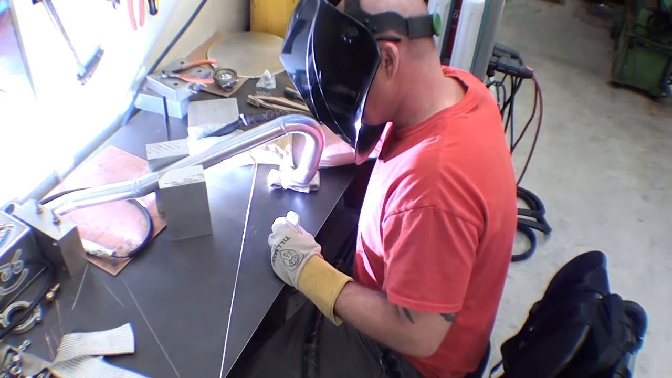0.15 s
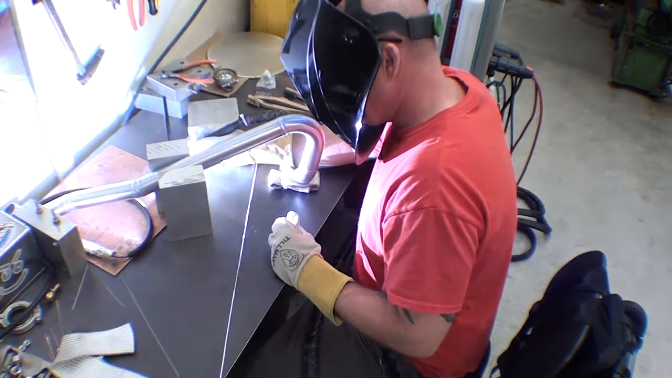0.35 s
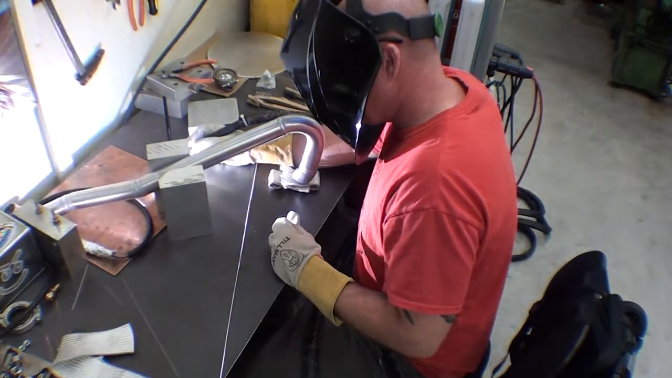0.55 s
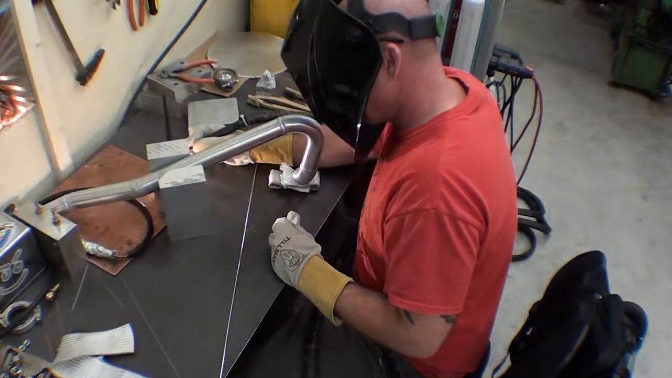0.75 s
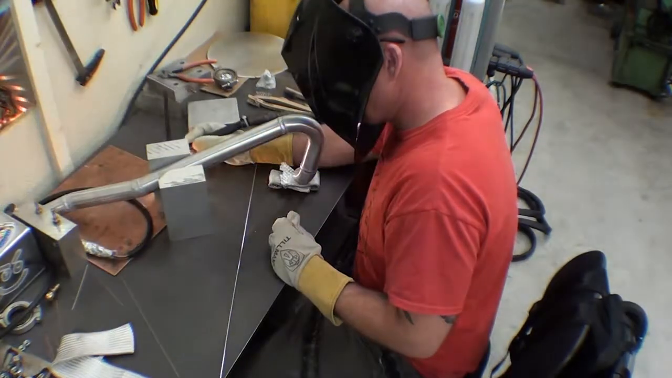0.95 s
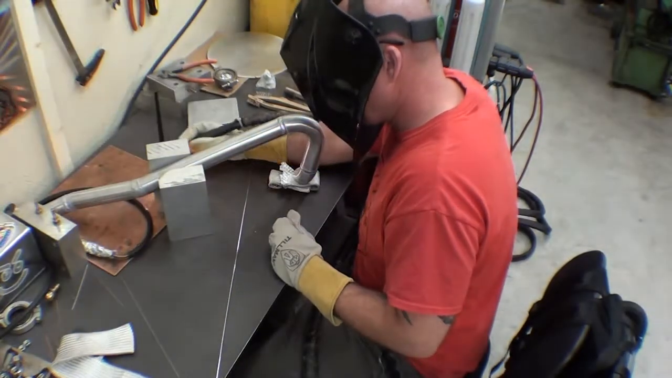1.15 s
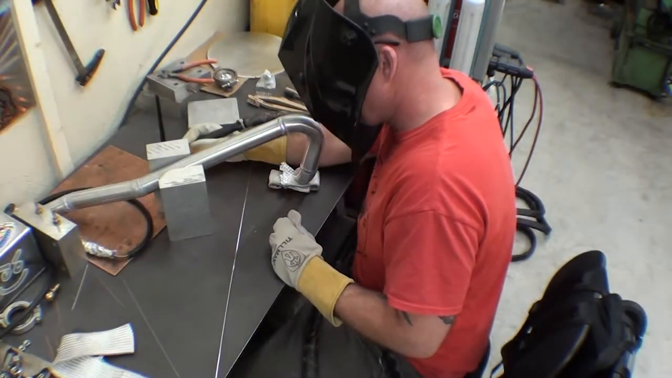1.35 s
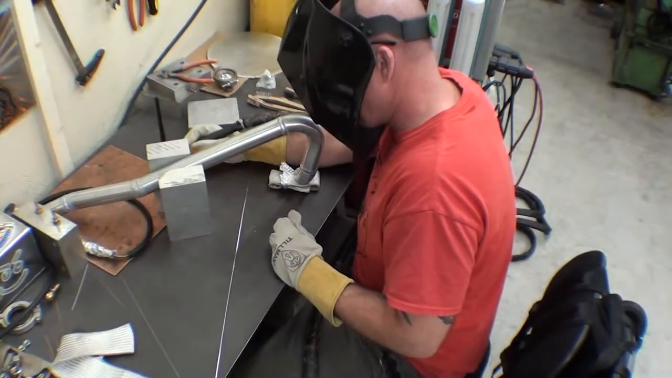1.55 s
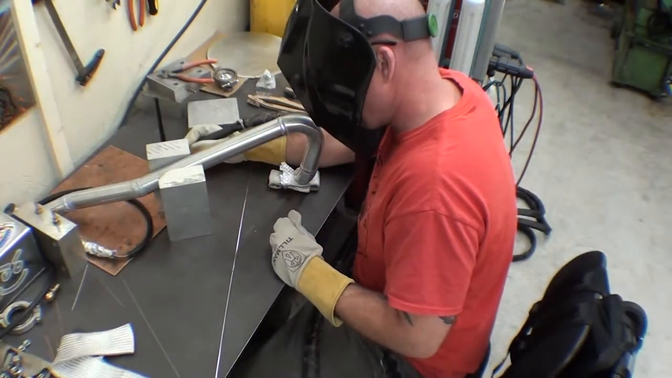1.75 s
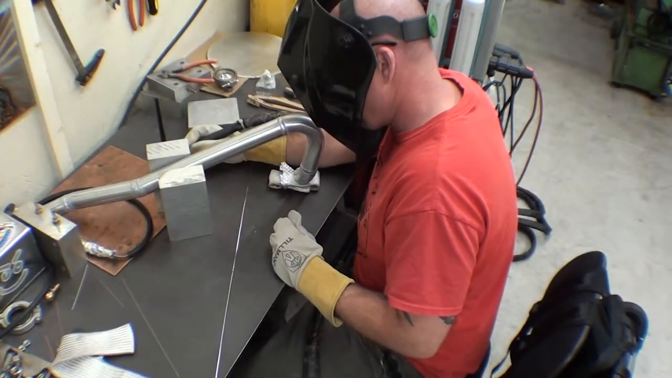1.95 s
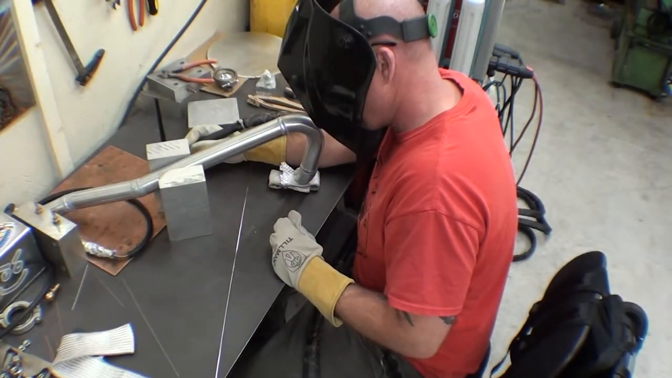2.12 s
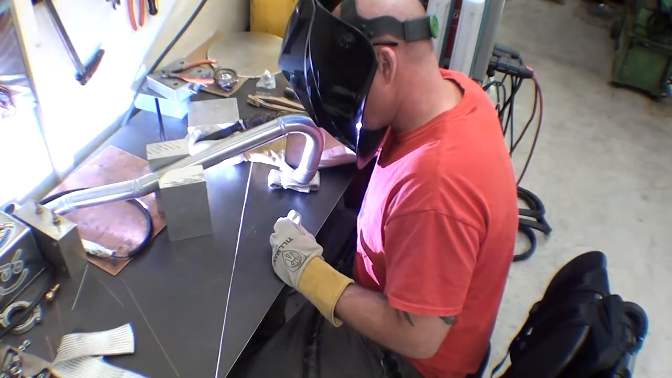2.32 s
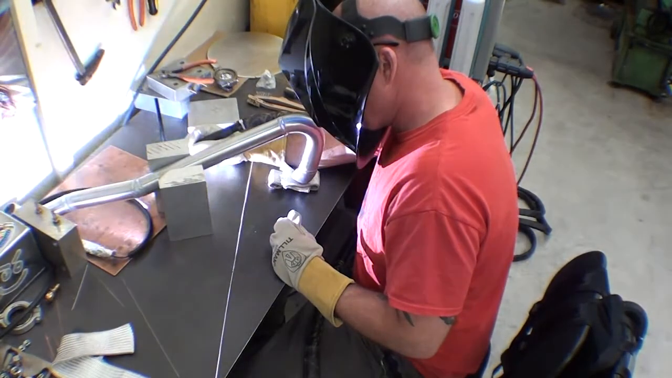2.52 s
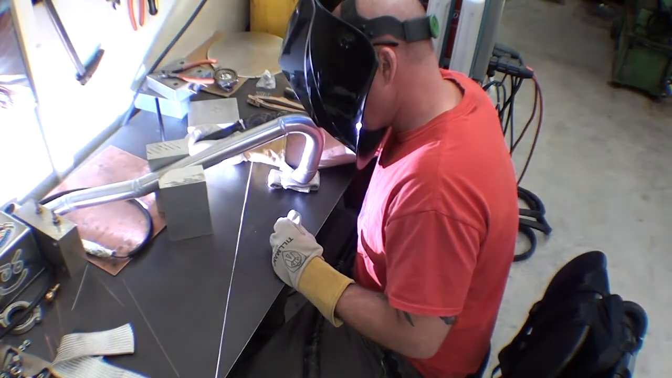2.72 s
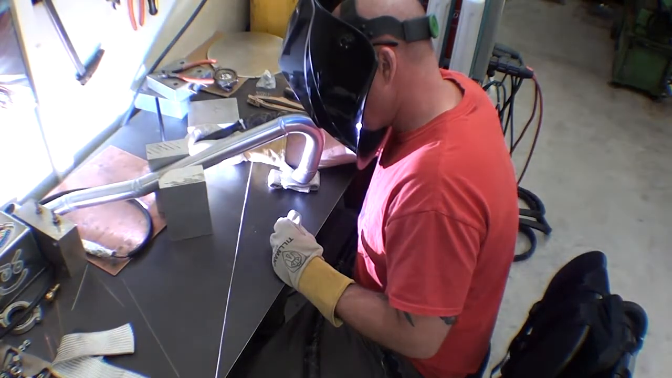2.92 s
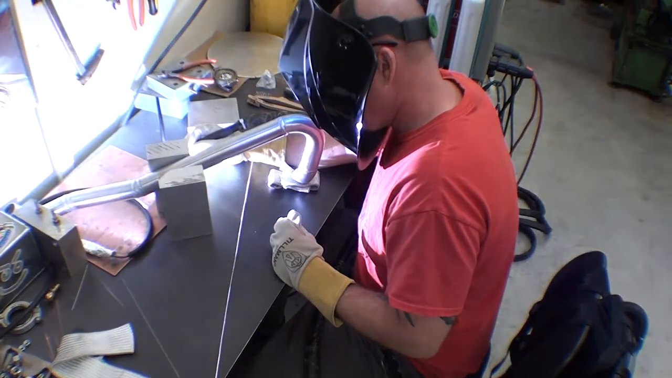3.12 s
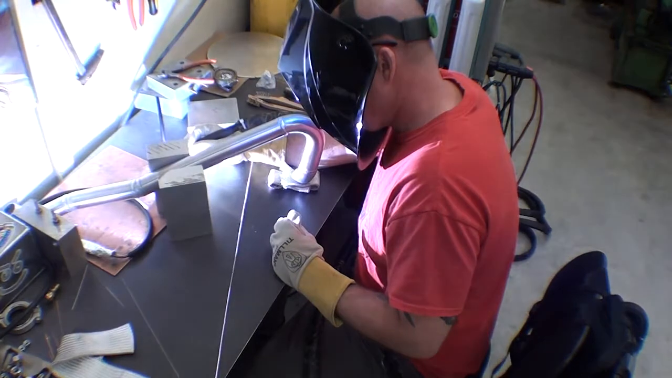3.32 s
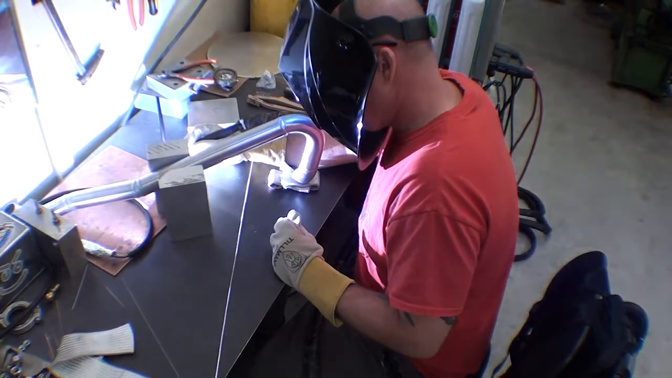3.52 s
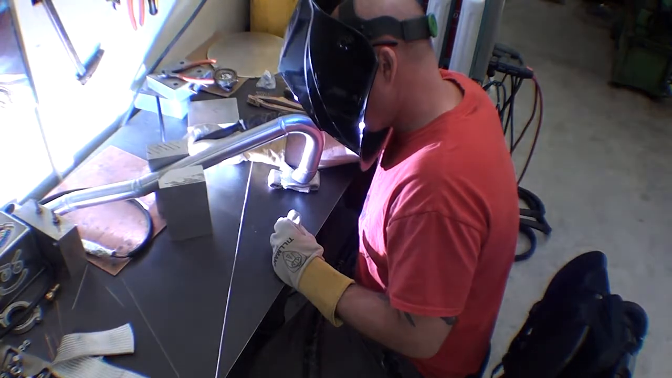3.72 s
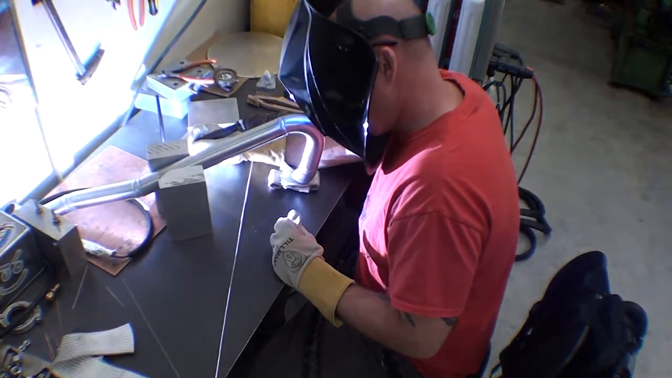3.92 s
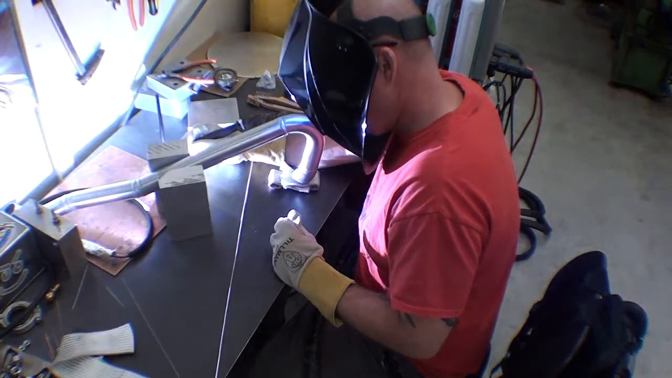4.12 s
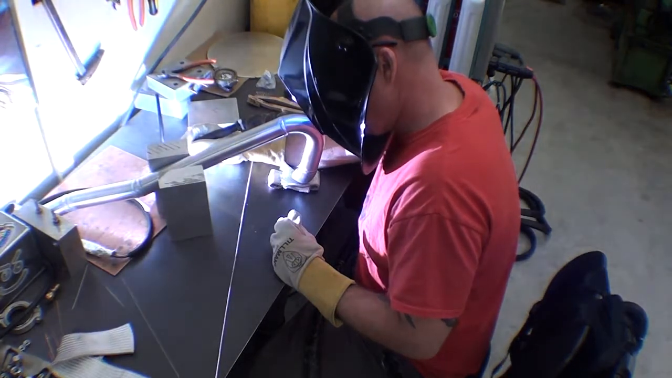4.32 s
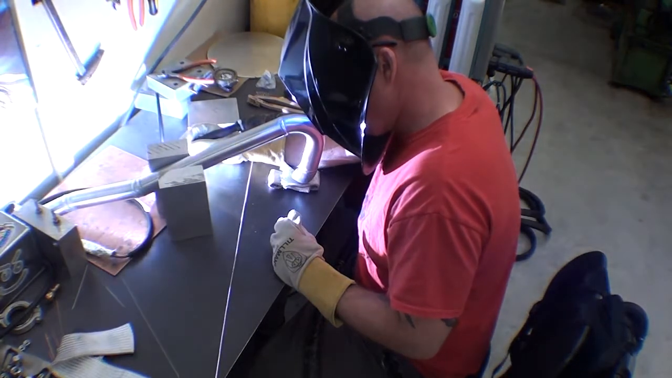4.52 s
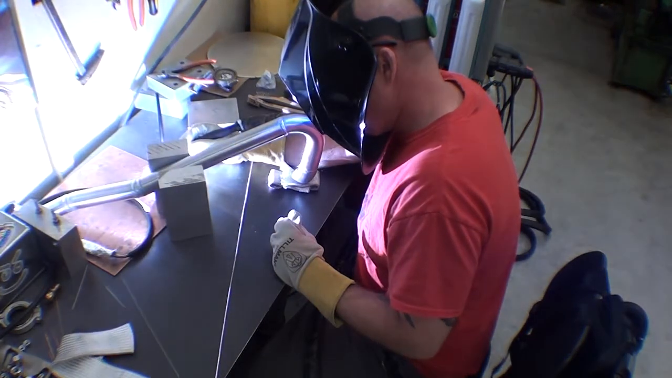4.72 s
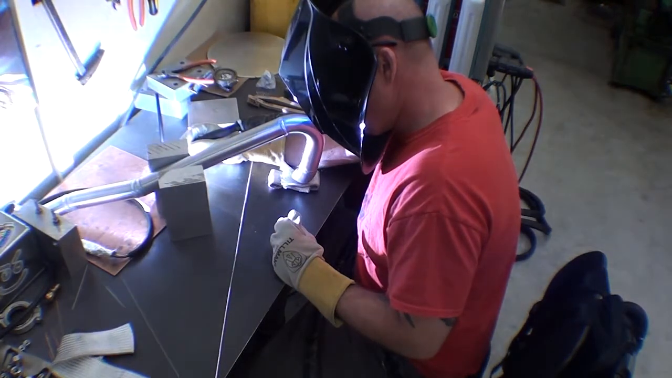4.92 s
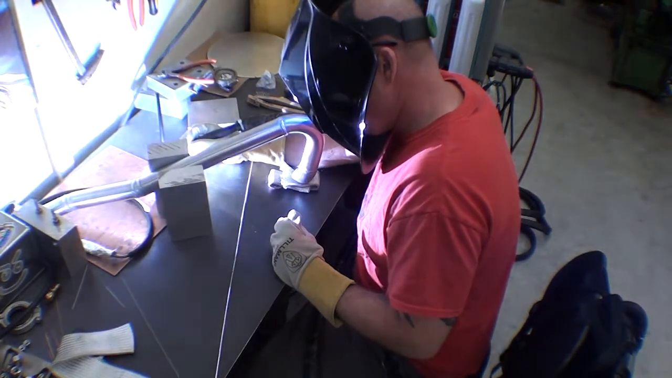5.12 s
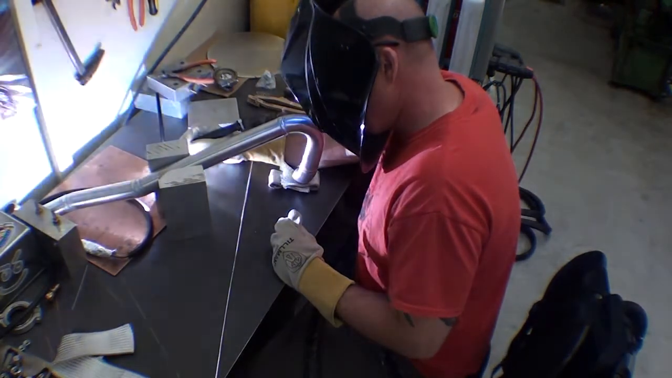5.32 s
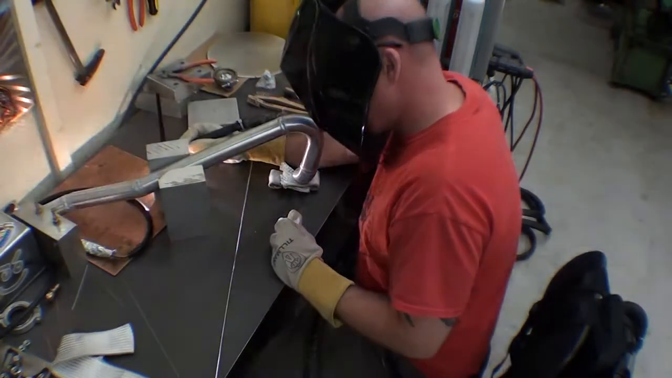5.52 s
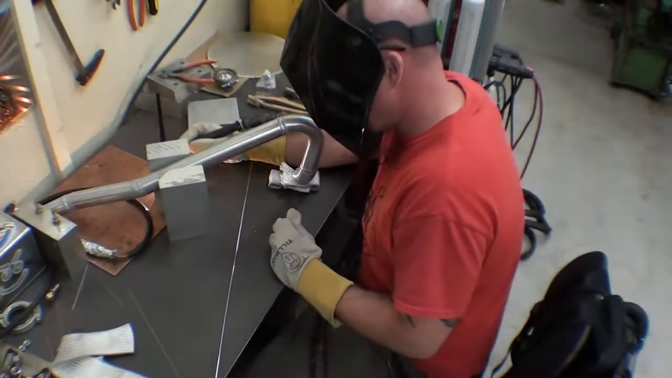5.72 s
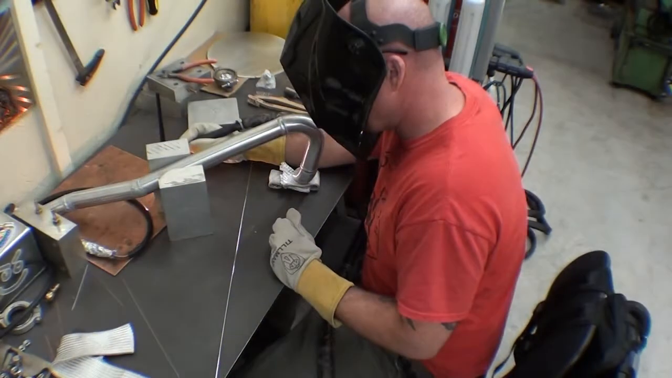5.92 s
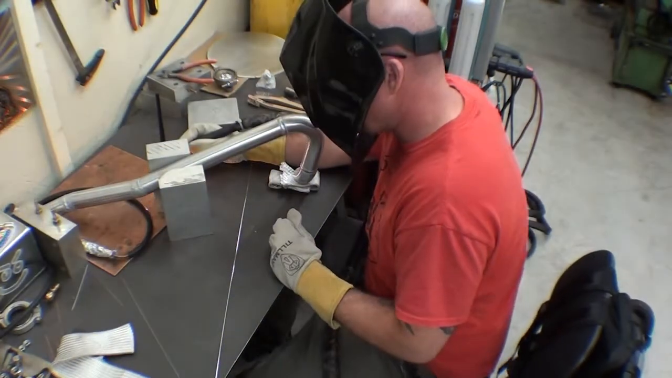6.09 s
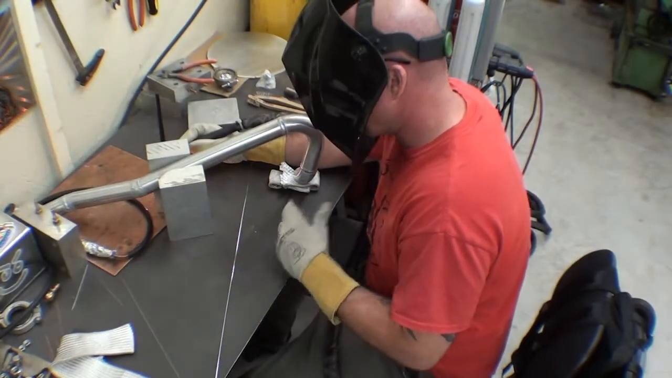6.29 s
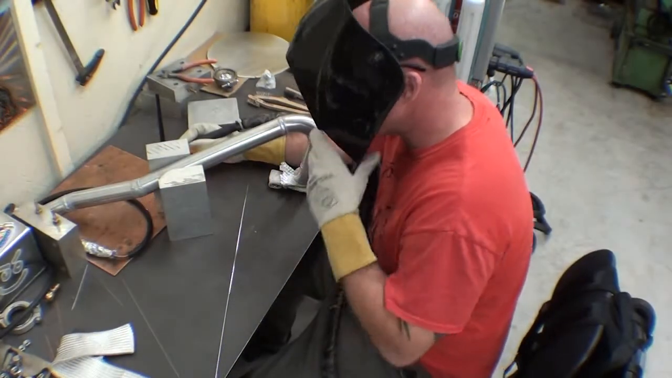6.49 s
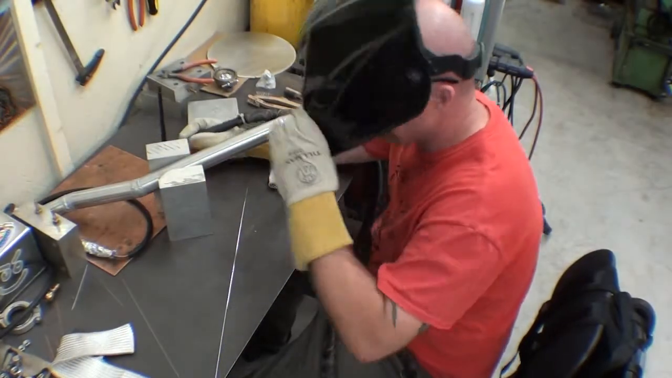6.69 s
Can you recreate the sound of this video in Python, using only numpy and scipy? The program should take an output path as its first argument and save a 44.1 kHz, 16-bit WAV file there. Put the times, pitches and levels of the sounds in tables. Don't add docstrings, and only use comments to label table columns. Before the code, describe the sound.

A loud, harsh electric welding buzz is already running close by and soon dies away. A soft fan hum rises in the pause, with a metallic tick, then a fizzing high-voltage crackle and sharp snaps relight the arc. It buzzes for about three seconds, its tone changing, then fades. Fan hum and tiny ticks follow, ending with a hollow plastic knock. Close microphone in a moderately reverberant garage.

```python
import sys
import numpy as np
from scipy import signal
from scipy.fft import rfft, irfft, next_fast_len
from scipy.io import wavfile
from scipy.ndimage import uniform_filter1d, map_coordinates

SR = 44100
rng = np.random.default_rng(int(sys.argv[2]) if len(sys.argv) > 2 else 0)


def attenuation_scalar(level_db):
    decades = np.asarray(level_db, float) / 20
    return 10 ** decades


def pcm_store(signal):
    levels = np.round(np.clip(np.atleast_2d(signal), -1, 1) * 32767)
    wavfile.write(sys.argv[1], SR, levels.astype(np.int16).T)


N = 297675
FLIP_HZ = 145.01
CYCLE_POINTS = 1 << 13
GARAGE_T60_S = 0.72

# strike_s, pedal_lift_s, out_s
WELD_TIMES = [
    (-.5, .525, 0.66),
    (2.303, 5.325, 5.395),
]
# start_s, level_db
STARTER = [(1.804, -27), (1.818, -24), (2.014, -21), (2.242, -21), (2.262, -26), (2.31, -25)]
# start_s, peak_db, pitch_hz, t60_s
TICKS = [(1.575, -33, 5600, .04), (1.712, -23.5, 3340, 0.24), (1.8032, -18, 8100, 0.034),
         (2.246, -10, 6300, 0.047), (2.267, -10.5, 6500, 0.051), (5.89, -38, 13000, .01),
         (5.901, -23, 9000, .03), (6.055, -38, 12000, .03), (6.147, -33, 13000, .02),
         (6.168, -32, 12000, .02), (6.586, -25, 5000, .03), (6.7202, -11, 5870, 0.018),
         (6.749, -13, 4500, 0.029)]


def column(rows, at):
    x, *rest = np.transpose(rows)
    return [np.interp(at, x, c) for c in rest]


def rms_one(x):
    return x / np.sqrt(np.mean(x ** 2) + 1e-20)


def highpass(x, order, hz):
    return signal.sosfilt(signal.butter(order, hz, "high", fs=SR, output="sos"), x)


def drift(rate_hz):
    knots = rng.standard_normal(int(N / SR * rate_hz) + 3)
    coarse = np.arange(0, N + 32, 32)
    return np.interp(np.arange(N), coarse, map_coordinates(knots, [coarse / SR * rate_hz], order=3))


def coloured(x, spectrum):
    hz = np.maximum(np.arange(N // 2 + 1) * SR / N, 1)
    point_hz, point_db = np.transpose(spectrum)
    gain = attenuation_scalar(np.interp(np.log(hz), np.log(point_hz), point_db))
    return rms_one(irfft(rfft(x) * gain, N))


def stereo_noise(side_db):
    mid, side = rng.standard_normal((2, N))
    side = signal.lfilter(*signal.butter(1, 1300, "high", fs=SR), side) + 0.094 * side
    return mid + attenuation_scalar(side_db) * side * [[1], [-1]]


def ring(clicks, hz, t60_s):
    r = attenuation_scalar(-60 / (max(t60_s, .002) * SR))
    w = 2 * np.pi * hz / SR
    return signal.lfilter([0, np.sin(w)], [1, -2 * r * np.cos(w), r * r], clicks + 1e-18)


def wavering(tones, waver_db, slip_rad, rate_hz):
    t = np.arange(N) / SR
    out = np.zeros(N)
    for hz, db in tones:
        level = np.sqrt(2) * attenuation_scalar(db + waver_db * drift(rate_hz))
        out += level * np.sin(2 * np.pi * hz * t + slip_rad * drift(rate_hz))
    return out


def arc():
    # delay_ms, level_db
    echoes = [(0, 0), (1.07, -3), (1.9, -7), (3.1, -6), (4.5, -9), (5.7, -10)]
    order_db = [-36, -12.5, -6.5, -5.5, -26, 1, -9.5, -11, -11.5, -8.5, -37.5, -18, -9.5, -10.5, -29, -79,
                -12.5, -18.5, -24, -26, -17, -19, -24.5, -29, -20.5, -31.5, -26, -27, -33, -22.5, -16,
                -18.5, -19, -16.5, -16.5, -21, -20, -12.5, -10, -17, -39, -18, -10, -13.5, -10.5, -8, -23.9,
                -29, -11.0, -14.5, -15.5, -35, -15.5, -18.5, -26.5, -35, -17, -30.6, -27, -28, -22.5, -26,
                -30, -22.5, -41, -35.6, -27, -27, -32, -23.5, -21.5, -29.9]
    # pitch_hz, level_db
    top_orders = [(6120, -32), (10400, 3), (11500, 0.5), (13400, -9.5), (14900, -8), (15600, -17)]
    # pitch_hz, density_db
    hiss_spectrum = [(900, -22), (1500, -8), (2800, -6), (3900, -13), (4800, -4.5), (7200, -1), (9000, -6),
                     (12000, -18), (15600, -41)]
    # time_s, current_db, length (0 short - 1 long)
    handling = [
        [(0, -2, 0.011), (.12, -2, 0.011), (.45, -2.5, .01)],
        [(2.3, -1.5, .01), (2.6, -1.5, 0.019), (3.3, 1, 0.18), (3.7, 2, 0.54), (3.95, 0.3, 1), (4.58, .5, 1),
         (4.82, -0.5, 0.87), (4.97, -3, 0.57), (5.25, -1.5, 0.66)],
    ]
    # delay_ms, short_arc_share, long_arc_share
    body_echoes = [
        [(0.893, -0.28, -.45), (4.932, -0.14, -.3), (0.483, -0.22, -.25), (5.25, -0.26, -.15), (2.3, .15, .15)],
        [(2.103, -0.082, 0.27), (6.381, -0.11, 0.17), (0.75, -0.041, 0.13), (4.692, 0.037, -0.18)],
    ]
    hiss_db = (-26.5, -30.5)
    jitter_s, scatter, low_scatter = 9e-6, 1.2, 3.2
    top_db, ripple_db, spread_db = -8.5, 5.5, 1.5
    t, order = np.arange(N) / SR, np.arange(1, 109)

    chance = rng.standard_normal((7, len(order)))
    arrivals = sum(attenuation_scalar(db) * np.exp(-2j * np.pi * order * FLIP_HZ * ms / 1000) for ms, db in echoes)
    diffuse = scatter * (chance[0] + 1j * chance[1]) * np.where(order < 24, low_scatter, 1)
    arrivals = 1.4j * arrivals + diffuse
    phase = arrivals / abs(arrivals)

    apart = np.clip((order - 5) / 5, 0, 1)
    ears = attenuation_scalar(spread_db * apart * chance[2] * [[.5], [-.5]])
    ears = ears * np.exp(.1j * apart * chance[3] * [[1], [-1]])

    below_db = 10 * np.log10(np.mean(attenuation_scalar(order_db[56:]) ** 2))
    ripple = ripple_db * np.clip(chance[4, 72:], -2, 1.5)
    high_db = below_db + top_db + column(top_orders, order[72:] * FLIP_HZ)[0] + ripple
    db = np.r_[order_db, high_db]

    place = ((t + jitter_s * drift(60.)) * FLIP_HZ % 1 * CYCLE_POINTS).astype(int)
    buzz, hiss = np.zeros((2, N)), np.zeros(N)
    for k in (0, 1):
        shuffle = np.clip(chance[5 + k], -2, 1.5)
        weld_buzz, weld_hiss = weld(WELD_TIMES[k], handling[k], body_echoes[k], hiss_db[k],
                                    db, phase, shuffle, place, ears)
        buzz += weld_buzz
        hiss += weld_hiss
    puff = 1 + .35 * np.cos(2 * np.pi * place / CYCLE_POINTS)
    return buzz, hiss * puff * coloured(stereo_noise(-12.5), hiss_spectrum)


def weld(times_s, handling, echoes, hiss_db, db, phase, shuffle, place, ears):
    # pitch_hz, change_db
    stretch_points = [(145, -4), (500, 0.5), (1100, 8), (2200, -5), (3600, -4), (7200, -3.5), (9000, -3.5),
                      (15600, -3)]
    arc_db, hiss_stretch_db = -20.5, -8.5
    sag_db_per_s, sag_db, release_db_per_s, tail_db = 195, 7, 214, -14.5
    dying_s, dying_depth, dying_db, dying_spread_db = 0.052, 0.52, 1.5, 4
    warm_s, top_drift_db = 0.12, 3.0
    beat_hz, beat_peak_s, throb = 10.3, 4.03, 0.8

    strike, lift, end = times_s
    t, order = np.arange(N) / SR, np.arange(1, 109)
    on = (t >= strike) & (t < end + GARAGE_T60_S)
    t, place = t[on], place[on]
    current, length = column(handling, t)
    length = np.clip(length, 0, 1)
    sagged = attenuation_scalar(current - np.clip(sag_db_per_s * (t - lift), 0, sag_db))
    since = np.clip(t - end, 0, None)
    release = attenuation_scalar(-release_db_per_s * since)
    ringing = np.maximum(release, attenuation_scalar(tail_db - 60 * since / GARAGE_T60_S))
    dying = np.clip((t - lift) / dying_s, 0, 1)
    warm = np.clip((t - strike) / warm_s, 0, 1) ** 2

    ms, short, long = np.transpose(echoes)
    late = np.exp(-2j * np.pi * np.outer(order * FLIP_HZ, ms / 1000))
    points = [(np.log(hz), d) for hz, d in stretch_points]
    stretch = column(points, np.log(order * FLIP_HZ))[0] / 2
    stretch = stretch + top_drift_db * shuffle * (order > 72)
    even = uniform_filter1d(db, size=9)
    dying_lines_db = even + dying_depth * (db - even) + dying_db + dying_spread_db * shuffle
    states = [(attenuation_scalar(db - stretch) * (1 + late @ short), (1 - dying) * (1 - length)),
              (attenuation_scalar(db + stretch) * (1 + late @ long), (1 - dying) * length),
              (attenuation_scalar(dying_lines_db), dying)]

    weak = np.isin(order, (26, 27, 28))
    beat = 1 + throb * np.clip(2.7 * length - .5, 0, 1) * np.cos(2 * np.pi * beat_hz * (t - beat_peak_s))
    snap = attenuation_scalar(current)
    groups = [(order < 3, sagged * warm),
              ((order > 2) & (order < 24), sagged),
              ((order > 23) & ~weak, snap),
              (weak, snap * beat)]

    buzz, hiss = np.zeros((2, N)), np.zeros(N)
    for lines, share in states:
        for pick, gain in groups:
            bins = np.pad(lines * phase * pick * ears, ((0, 0), (1, 0)))
            cycle = irfft(bins, CYCLE_POINTS) * CYCLE_POINTS / 2
            buzz[:, on] += share * gain * ringing * cycle[:, place]
    hiss[on] = attenuation_scalar(hiss_db + hiss_stretch_db * length * (1 - dying)) * release
    return attenuation_scalar(arc_db) * buzz, hiss


def sweeps():
    # start_s, length_s, from_hz, to_hz, level_db
    glides = [(0.537, 0.13, 2750, 3050, -42), (0.613, 0.084, 410, 645, -30.5),
              (2.312, 0.043, 444, 442, -17), (2.341, .08, 460, 436, -18), (5.335, .07, 3200, 3400, -40),
              (5.371, 0.051, 430, 610, -24), (5.385, 0.094, 3450, 4450, -38.5)]
    rise_s, fall_share, edge_db = .015, 0.68, -21
    width_hz, width_share = 55, .035
    out = np.zeros(N)
    hz = FLIP_HZ * np.arange(1, 40)[:, None]
    for s, length, from_hz, to_hz, db in glides:
        at = np.arange(round(s * SR), round((s + length) * SR))
        age = at / SR - s
        centre = from_hz + (to_hz - from_hz) * age / length
        rise = np.clip(1 - age / rise_s, 0, 1)
        fall = np.clip(1 - (1 - age / length) / fall_share, 0, 1) ** 2
        tones = np.sin(2 * np.pi * (hz * at / SR + rng.random(hz.shape)))
        near = np.exp(-.5 * ((hz - centre) / (width_hz + width_share * centre)) ** 2)
        out[at] += np.sqrt(2) * attenuation_scalar(db + edge_db * (rise + fall)) * np.sum(near * tones, axis=0)
    return out


def starter():
    # pitch_hz, density_db
    spark = [(1760, -52), (3000, -15.5), (3520, -14), (3610, -22), (4060, -11.5), (6630, -1.5), (6810, -3),
             (7350, 1), (8970, -7.5), (10700, -8), (11500, -12.5), (13800, -11), (15600, -19)]
    # pitch_hz, level_db
    spark_lines = [(3429, -49), (4188, -46), (4468, -46), (4963, -42), (5184, -50), (5340, -44),
                   (5561, -45), (5938, -49), (6089, -47), (6465, -35), (6842, -48), (7219, -41),
                   (7364, -42), (7472, -37), (7634, -47), (7887, -40), (8371, -44), (8592, -46),
                   (8780, -45), (9135, -43), (9512, -45), (9862, -46), (10277, -41), (10557, -42)]
    # time_s, pitch_hz, level_db
    whistle_path = [(2.25, 4360, -50), (2.256, 4300, -32), (2.28, 4060, -33), (2.3, 4080, -35),
                    (2.33, 4050, -50)]
    sparks_per_s = 376
    crack_db, wash_db, whine_db = -7.0, -3.5, 22.5
    t = np.arange(N) / SR
    start, stop = STARTER[0][0], STARTER[-1][0]
    span = (t >= start) & (t < stop)

    at = (np.arange(start, stop, 1 / sparks_per_s) * SR).astype(int)
    clicks = np.zeros(N)
    clicks[at] = attenuation_scalar(2.5 * rng.standard_normal(len(at))) * rng.choice([-1] + 9 * [1], len(at))
    crack = coloured(clicks, spark) * np.sqrt(span.mean())
    wash = coloured(stereo_noise(-14.0), spark) * attenuation_scalar(0.91 * drift(39.9))
    whine = wavering(spark_lines, waver_db=3.5, slip_rad=0.97, rate_hz=25.) * (t < TICKS[3][0])
    sparks = attenuation_scalar(crack_db) * crack + attenuation_scalar(wash_db) * wash + attenuation_scalar(whine_db) * whine

    hz, db = column(whistle_path, t)
    turn = 2 * np.pi * np.cumsum(hz * (1 + 0.0041 * drift(150.))) / SR
    partials = np.sin(turn) + attenuation_scalar(9.0) * np.sin(2 * turn) + attenuation_scalar(-1.0) * np.sin(3 * turn)
    whistle = attenuation_scalar(db + 2.7 * drift(120.)) * partials
    whistling = (t > whistle_path[0][0]) & (t < whistle_path[-1][0])
    return span * attenuation_scalar(column(STARTER, t)[0]) * sparks + whistle * whistling


def ticks():
    out = np.zeros(N)
    age = np.arange(4000) / SR
    for s, db, hz, t60 in TICKS:
        band = signal.butter(2, [hz * 0.33, min(hz * 1.04, .45 * SR)], "band", fs=SR, output="sos")
        burst = signal.sosfilt(band, rng.standard_normal(4000) * attenuation_scalar(-60 * age / t60))
        at = round(s * SR)
        out[at:at + 4000] += (attenuation_scalar(db) * burst / abs(burst).max())[:N - at]
    return out


def knocks():
    # start_s, peak_db
    blows = [(1.715, -32), (6.586, -32), (6.7224, -11.5), (6.731, -14), (6.743, -15), (6.7485, -17)]
    # pitch_hz, level_db, t60_s
    shell = [(594, -5, 0.043), (706, 2.5, 0.036), (1000, -1, 0.037), (1590, -5, 0.041), (2230, -10, 0.027),
             (2750, -13, 0.009), (4660, -14, 0.008), (5440, -15, 0.009)]
    at = [round(s * SR) for s, db in blows]
    peak_db = np.array(blows)[:, 1]
    out = np.zeros(N)
    for hz, level_db, t60 in shell:
        clicks = np.zeros(N)
        clicks[at] = attenuation_scalar(peak_db + level_db - 3.5 + rng.normal(0, 5.9, len(at)))
        out += ring(clicks, hz, t60)
    return highpass(out, 2, 350)


def garage(x):
    wall_cut_hz = 5800
    size = next_fast_len(N + SR)
    hz = np.arange(size // 2 + 1) * SR / size
    sides = np.zeros((2, len(hz)), complex)
    for k, lag_s in enumerate(rng.uniform(.015, .045, 16)):
        loss = attenuation_scalar(-60 * lag_s / GARAGE_T60_S) / (1 + 1j * hz / wall_cut_hz * 0.34)
        trip = loss * np.exp(-2j * np.pi * hz * lag_s)
        sides[k % 2] += trip / (1 - trip) * (-1) ** (k // 2)
    mid = sides.mean(axis=0)
    sides = mid + 0.2 * (sides - mid)
    return irfft(rfft(x, size) * sides, size)[:, :N]


def workshop():
    # pitch_hz, density_db
    fan = [(15, -76), (25, -37), (110, -24.5), (140, -28), (165, -17), (282, -5), (389, -9), (458, -8),
           (510, -4.5), (897, -9), (1240, -10), (2300, -14), (4160, -25), (7130, -24), (15600, -51.5)]
    # pitch_hz, level_db
    fan_tones = [(285.3, -42.5), (500.6, -51), (522.2, -44.5), (570.6, -39), (629.8, -46), (861.3, -49.5),
                 (1217, -47.5), (1707, -52.5)]
    # pitch_hz, level_db
    inverter = [(2293.3, -50), (4586.6, -61.5), (6880, -65), (9173.2, -64), (11466, -66), (13760, -68)]
    air_db, tone_db, whine_db = 19.0, 49.5, 51.5
    air = attenuation_scalar(air_db + 1.0 * drift(15.)) * coloured(stereo_noise(-12.0), fan)
    tones = attenuation_scalar(tone_db) * wavering(fan_tones, waver_db=3.0, slip_rad=0.5, rate_hz=12.)
    whine = attenuation_scalar(whine_db) * wavering(inverter, waver_db=1.5, slip_rad=0.83, rate_hz=20.)
    return automatic_gain() * (air + tones + whine)


def automatic_gain():
    ducked_db, creep_db_per_s, recover_db_per_s = -60, 2, 6.5
    duck_wait_s, duck_s = 0.07, 0.12
    (_, _, first_out), (strike, _, last_out) = WELD_TIMES
    spark_start, end = STARTER[0][0], N / SR
    low = ducked_db + 2.5
    high = low + recover_db_per_s * (spark_start - first_out)
    ducked = strike + duck_wait_s + duck_s
    crept = ducked_db + creep_db_per_s * (last_out - ducked)
    path = [(0, ducked_db), (first_out, low), (spark_start, high), (strike + duck_wait_s, high),
            (ducked, ducked_db), (last_out, crept), (end, crept + recover_db_per_s * (end - last_out))]
    return attenuation_scalar(column(path, np.arange(N) / SR)[0])


def scene():
    buzz, hiss = arc()
    loose = hiss + sweeps() + starter()
    torch = (buzz + loose) * attenuation_scalar([[1.0], [-.9]])
    small = ticks() + knocks()
    room = attenuation_scalar(-14.0) * garage(loose.mean(axis=0) + small)
    return torch + small + room + workshop()


def top_cut(x):
    return signal.sosfilt(signal.butter(12, 15720, fs=SR, output="sos"), x)


def record(dry):
    thin = highpass(dry, 1, 40)
    mid = thin.mean(axis=0)
    side = thin - mid
    mix = mid + highpass(side, 1, 250) + 0.11 * side
    mix = signal.sosfilt(signal.ellip(10, 1, 50, 15700, fs=SR, output="sos"), mix)
    return top_cut(mix)


dry = scene()
out = record(dry)
pcm_store(out)
```